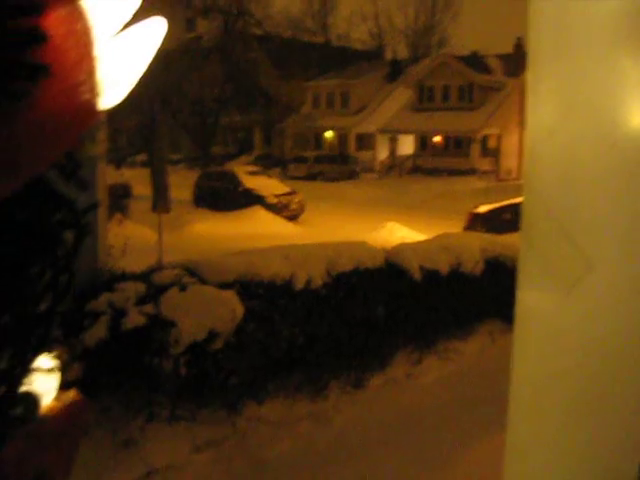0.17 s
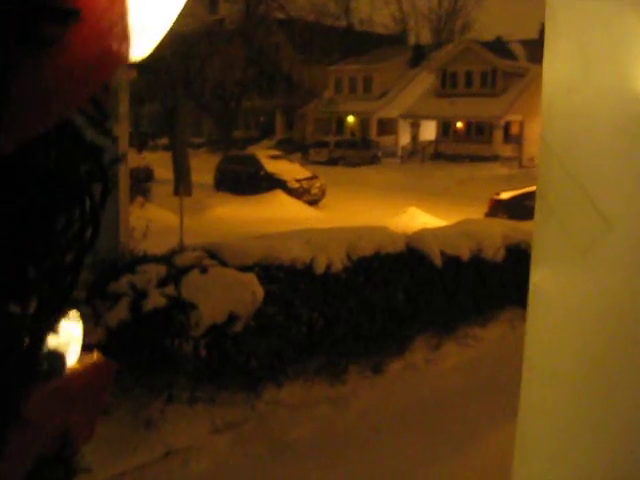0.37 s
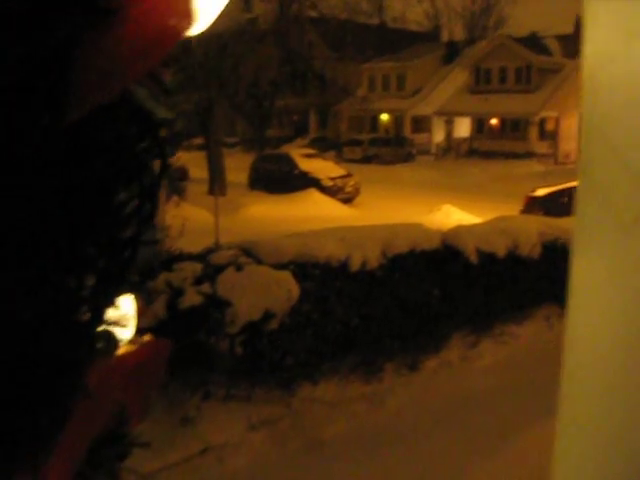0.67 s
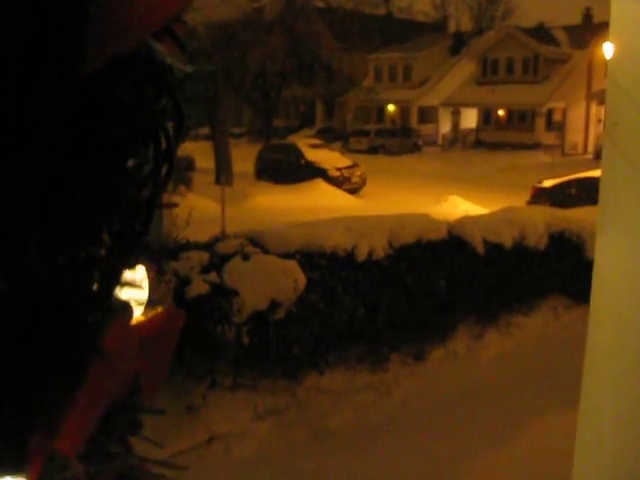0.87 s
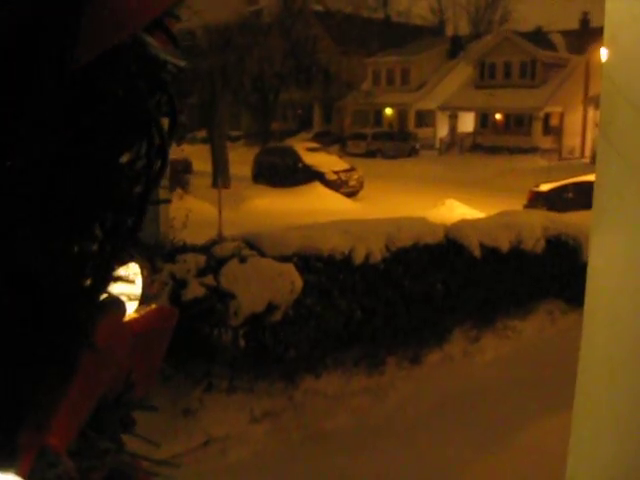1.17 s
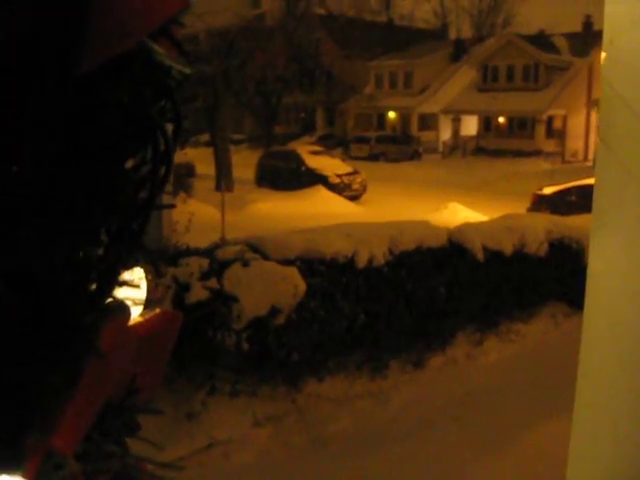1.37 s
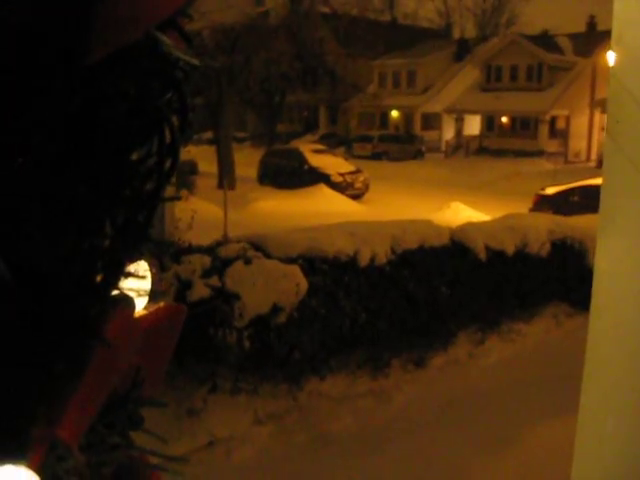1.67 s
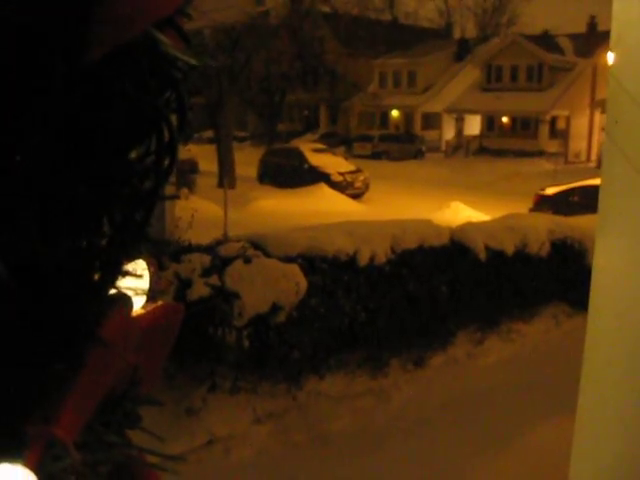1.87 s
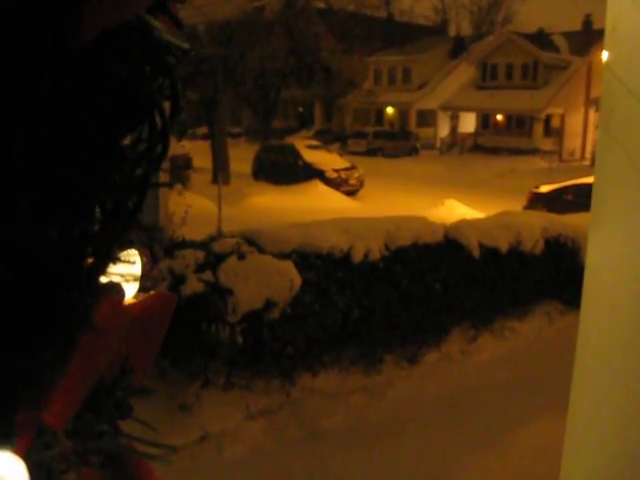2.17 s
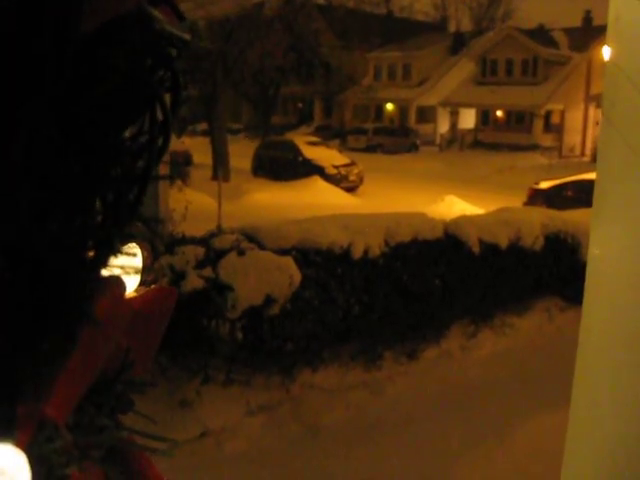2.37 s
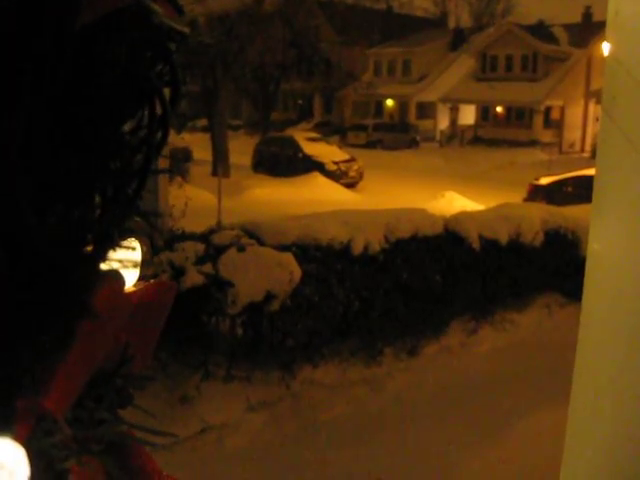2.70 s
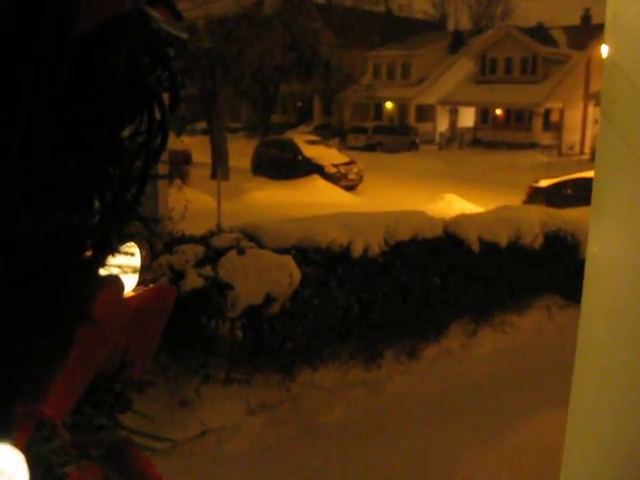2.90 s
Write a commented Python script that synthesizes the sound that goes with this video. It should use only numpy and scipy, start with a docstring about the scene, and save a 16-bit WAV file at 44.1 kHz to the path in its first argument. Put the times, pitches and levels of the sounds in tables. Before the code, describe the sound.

Ice pellets fall on crusted snow, hedge and porch at night: a fine steady hiss and crackling patter, with irregular crisp taps near a small camera in a doorway and a very faint street hum.

```python
"""Ice pellets tap and scatter on crusted snow, a hedge and a porch at night, heard by a small camera
in a doorway. Far pellets are flickering shaped noise (hiss); nearer ones are noise bursts (patter) and
short decaying sines (ticks); the nearest are timed taps of ring, crack, board knock and splinters.
Low shaped noise is the street hum. The camera's input has a broad notch in the treble, near 7.9 kHz."""
import sys
import numpy as np
from scipy import signal
from scipy.fft import rfft, irfft
from scipy.io import wavfile
from scipy.ndimage import uniform_filter1d

SR = 44100
rng = np.random.default_rng(int(sys.argv[2]) if len(sys.argv) > 2 else 0)


def wrap_up_sound(samples):
    """Save the sound to the file named by the first command line argument, as 16-bit audio."""
    columns = np.atleast_2d(samples).T
    # keep every value between -1 and 1, then stretch to whole-number steps
    tamed = np.clip(columns, -1, 1)
    steps = np.round(tamed * 32767).astype(np.int16)
    wavfile.write(sys.argv[1], SR, steps)


N = 134064  # samples


def undb(db):
    """dB to amplitude ratio."""
    return 10 ** (np.asarray(db) / 20)


def unit(x):
    """Scale to RMS 1."""
    return x / np.sqrt(np.mean(x ** 2))


def colour(x, points):
    """Shape the spectrum by (f/Hz, level/dB) points, log-frequency interpolation; RMS 1."""
    hz, db = np.array(points).T
    f = np.maximum(np.fft.rfftfreq(len(x), 1 / SR), 1)
    gain = undb(np.interp(np.log(f), np.log(hz), db))
    return unit(irfft(rfft(x) * gain, len(x)))


def band(x, lo_hz, hi_hz):
    """Band-pass noise, scaled to RMS 1 over its first 3 ms."""
    sos = signal.butter(3, [lo_hz, hi_hz], "band", fs=SR, output="sos")
    y = signal.sosfilt(sos, x)
    return y / np.sqrt(np.mean(y[:132] ** 2))


def walk(rate_hz):
    """Random levels held 1 / rate_hz, smoothed over one hold; RMS near 1."""
    hold = int(SR / rate_hz)
    steps = np.repeat(rng.standard_normal(N // hold + 1), hold)
    return unit(uniform_filter1d(steps, hold))[:N]


def add(out, start_s, x):
    """Mix x into out at start_s, cut at the end of out."""
    i = int(start_s * SR)
    out[i:i + len(x)] += x[:max(len(out) - i, 0)]


# Pellet noise spectrum, far hiss and patter: f/Hz, relative density level/dB
PELLET_SPECTRUM = [(300, -6.5), (700, -8.5), (1500, -4), (2500, -1.5), (4000, -0.5), (6000, -2), (9000, -2),
                   (12000, -0.5), (16000, -1)]
HISS_DB, FLICKER_RMS_DB = -3, 1.5


def hiss():
    """Countless far pellets merge into shaped noise; its level flickers a little."""
    gain = undb(HISS_DB + FLICKER_RMS_DB * walk(rate_hz=60))
    return gain * colour(rng.standard_normal(N), PELLET_SPECTRUM)


PATTER_PER_S, PATTER_DB, PATTER_SPREAD_DB, PATTER_FADE_S = 1500, -5, 2.5, 0.0019


def patter():
    """Small pellets crush into the crust: broadband bursts whose powers add and decay."""
    u = rng.random((int(PATTER_PER_S * N / SR), 2))
    hit_power = np.zeros(N)
    # factor 2: amplitude dB to power
    hit_power[(u[:, 0] * N).astype(int)] = undb(-2 * PATTER_SPREAD_DB * np.log(1 - u[:, 1]))
    power = signal.lfilter([1], [1, -np.exp(-2 / (PATTER_FADE_S * SR))], hit_power)
    bursts = np.sqrt(power) * rng.standard_normal(N)
    return undb(PATTER_DB) * colour(bursts, PELLET_SPECTRUM)


TICKS_PER_S, TICK_DB, TICK_SPREAD_DB = 500, -14.5, 2.5
TICK_FADE_S, TICK_LOW_HZ, TICK_OCTAVES = 0.0017, 2256, 2.6


def ticks():
    """Pellets on twigs and ice: decaying sines of random length, at random pitch."""
    out, t = np.zeros(N), np.arange(256) / SR
    for at, pitch, strength, length in rng.random((int(TICKS_PER_S * N / SR), 4)):
        hz = min(TICK_LOW_HZ * 2 ** (TICK_OCTAVES * pitch), .4 * SR)
        fade_s = TICK_FADE_S * (0.12 + 3.0 * length)
        level = undb(-TICK_SPREAD_DB * np.log(1 - strength))
        add(out, at * N / SR, level * np.exp(-t / fade_s) * np.sin(2 * np.pi * hz * t))
    return undb(TICK_DB) * unit(out)


# Street hum spectrum: f/Hz, relative density level/dB
STREET_SPECTRUM = [(20, -57), (50, -2), (100, -1.5), (170, 1), (215, 0.5), (241, 3.5), (270, -3.5),
                   (340, -6), (500, -3), (1000, -9.5), (2000, -17.5)]
STREET_DB = -50


def street():
    """Quiet street: steady noise weighted to the lows."""
    return undb(STREET_DB) * colour(rng.standard_normal(N), STREET_SPECTRUM)


# Porch board modes under a hard pellet: f/Hz, relative level/dB, t60/s
BOARD_MODES = [(491, -13.5, .06), (699, -5.5, 0.047), (798, -8, .11), (875, 7, 0.011), (1036, -1, 0.036),
               (1266, -13.5, 0.079), (1441, -10.5, 0.11), (1686, -5, 0.033), (1827, -11, 0.046),
               (2720, -11.5, 0.098)]


def board_modes(t):
    """Decaying sine per board mode; summed peak is 1."""
    modes = np.array([undb(db) * np.exp(-np.log(1000) * t / t60_s) * np.sin(2 * np.pi * hz * t)
                      for hz, db, t60_s in BOARD_MODES])
    return -modes / np.abs(modes.sum(axis=0)).max()


# Nearest pellets: t/s, relative knock level/dB, ring f/Hz, relative ring level/dB,
# high f/Hz, relative high level/dB
NEAREST_PELLETS = [(0.0461, -72, 3670, -44, 12000, -30.5), (0.051, -61, 3600, -48, 12340, -43),
                   (0.0934, -49.5, 6200, -40, 12640, -41), (0.1169, -53, 3240, -41, 14410, -38),
                   (0.182, -58, 4720, -46, 13070, -37), (0.1995, -48, 4200, -39, 14600, -33),
                   (0.215, -63, 4460, -48, 13720, -39), (0.228, -65, 3290, -61, 11630, -40),
                   (0.2371, -69, 6120, -43, 10400, -41), (0.265, -56, 5150, -36, 10310, -44),
                   (0.2968, -57, 2670, -47, 12920, -42), (0.3462, -56, 6140, -48, 10750, -39),
                   (0.3559, -60, 3570, -39.5, 13370, -40), (0.3695, -58, 5260, -33, 9900, -35),
                   (0.3796, -67, 5560, -42, 10700, -36), (0.3887, -53, 5160, -32, 12700, -34.5),
                   (0.3904, -57, 4640, -25.5, 10830, -42), (0.3967, -67, 4570, -43, 11760, -33),
                   (0.417, -63, 4280, -38, 13590, -37), (0.483, -68, 5040, -51, 9820, -43),
                   (0.5158, -37, 6000, -28, 13100, -31), (0.5287, -61, 4600, -40, 13800, -44),
                   (0.54, -68, 6310, -53.5, 13630, -41), (0.692, -32.5, 3950, -28, 14600, -30),
                   (0.7072, -41, 4570, -34, 14210, -32), (0.6952, -34, 2330, -32, 14300, -42),
                   (0.713, -59, 4390, -44, 13070, -39), (0.8095, -60, 5400, -39, 14790, -42),
                   (0.8156, -64, 2520, -41, 9840, -45), (0.8278, -39, 4900, -35.5, 15090, -48),
                   (0.8459, -45, 4900, -30, 15200, -36.5), (0.8978, -59, 5430, -41, 13330, -40),
                   (0.9189, -59, 4330, -36.5, 12580, -36), (0.981, -61, 4400, -45, 15090, -51),
                   (1.0161, -66, 4390, -46, 9990, -45), (1.0761, -64, 4640, -38, 12730, -47),
                   (1.168, -46, 5210, -40, 14280, -41), (1.1997, -54, 3040, -40, 12830, -47),
                   (1.2179, -57, 3740, -22, 11500, -26), (1.2205, -49, 4340, -43, 12400, -33),
                   (1.223, -63, 3120, -32, 14000, -40), (1.2294, -61, 4950, -40, 15050, -31),
                   (1.244, -46, 5790, -35, 14360, -32), (1.2678, -52, 6000, -37, 13050, -35),
                   (1.278, -69, 4440, -45, 14880, -35), (1.2878, -41, 3250, -36.5, 10190, -52),
                   (1.3198, -40, 3800, -34, 13400, -30.5), (1.3331, -55, 5560, -34, 12500, -34),
                   (1.375, -43.5, 2900, -39, 13000, -33), (1.4069, -58, 5130, -32, 14360, -31),
                   (1.413, -45, 6150, -33, 9600, -29.5), (1.4242, -57, 3900, -37, 10380, -36),
                   (1.441, -53, 3230, -59, 11610, -37), (1.4522, -61, 6270, -40, 12360, -40),
                   (1.4622, -54, 4690, -39, 14080, -35), (1.4948, -51, 5100, -39, 10120, -40),
                   (1.5157, -45, 6460, -39, 13240, -43), (1.53, -47, 4690, -37, 14560, -41),
                   (1.54, -57, 4240, -57, 9880, -41), (1.5695, -58, 5020, -44, 11070, -42),
                   (1.5938, -52, 4970, -36, 11600, -38), (1.6129, -50, 4390, -49, 10790, -42),
                   (1.623, -59, 4560, -37, 10400, -36), (1.6354, -46, 3850, -30.5, 14190, -35),
                   (1.659, -49, 4900, -37.5, 12770, -38), (1.668, -62, 2470, -41, 15250, -32),
                   (1.7295, -49, 6300, -33, 10100, -40), (1.736, -55, 5100, -40, 10000, -36),
                   (1.7423, -44, 3980, -36.5, 13310, -41), (1.7493, -60, 2650, -48, 11860, -41),
                   (1.756, -45, 4400, -44, 12300, -37.5), (1.8105, -45.5, 4750, -41, 13310, -39),
                   (1.829, -62, 5340, -45, 10700, -31), (1.8355, -42, 3970, -35, 9900, -33),
                   (1.8428, -68, 2820, -40.5, 11300, -46), (1.8693, -53, 4900, -32, 13700, -33),
                   (1.903, -47, 4900, -30, 11000, -33), (1.9049, -47, 3120, -31, 14300, -29.5),
                   (1.9131, -64, 4540, -43, 10400, -44), (1.918, -41, 4500, -31.5, 14130, -40),
                   (1.9675, -56, 3620, -53, 12300, -36.5), (2.0188, -51, 3020, -44, 14500, -37),
                   (2.058, -68, 6220, -47, 10200, -37), (2.0803, -65, 4670, -45, 10230, -41),
                   (2.103, -46, 5600, -35, 14210, -35), (2.1372, -50, 5120, -43, 13400, -37),
                   (2.147, -66, 5900, -35, 13260, -36), (2.1548, -62, 4460, -42, 9370, -37),
                   (2.221, -18.5, 3900, -28, 13370, -25), (2.2255, -36, 2620, -36, 15200, -36),
                   (2.2324, -49, 4840, -53, 9600, -34), (2.292, -45, 4180, -31, 12830, -32.5),
                   (2.2981, -41, 3240, -28, 11600, -31), (2.2983, -64, 5860, -26, 11700, -31),
                   (2.306, -50, 4730, -45, 11500, -39), (2.311, -59, 3340, -55, 10700, -35.5),
                   (2.3263, -63, 5960, -45, 14860, -37), (2.351, -45, 6400, -40, 10340, -45),
                   (2.3851, -56, 5200, -34.5, 10800, -39), (2.4222, -50, 4310, -39.5, 13400, -36),
                   (2.438, -66, 4070, -45, 12080, -35.5), (2.455, -63, 5790, -36, 9300, -49),
                   (2.4697, -62, 4270, -36.5, 9220, -40), (2.4978, -50, 6200, -33.5, 13400, -29.5),
                   (2.5215, -62, 5750, -39, 14320, -32), (2.533, -55, 4500, -34, 12800, -24.5),
                   (2.5753, -58, 3600, -44, 11200, -42), (2.5812, -66, 5000, -44, 11090, -40),
                   (2.611, -63, 5700, -38, 15220, -37), (2.6138, -63, 4600, -34.5, 12000, -44),
                   (2.6277, -54, 3820, -41, 10900, -35.5), (2.6798, -66, 4200, -36, 12490, -40),
                   (2.727, -63, 5730, -38, 13370, -39), (2.7562, -62, 6550, -33, 12360, -43),
                   (2.7653, -64, 1840, -35, 12270, -37), (2.7707, -60, 2780, -51, 11670, -35),
                   (2.784, -60, 2560, -49, 14250, -37), (2.7918, -60, 5460, -35, 15090, -41),
                   (2.8, -57, 4300, -34, 13110, -40), (2.8177, -62, 3520, -39, 10700, -38),
                   (2.8582, -50, 5990, -35, 13740, -34), (2.8683, -62, 4160, -37, 10700, -36),
                   (2.8878, -44, 3960, -33, 13720, -38), (2.9238, -58, 3950, -38, 13500, -33),
                   (2.9532, -53, 6140, -31, 13500, -32), (3.0106, -59, 3470, -42, 15100, -31)]
RISE_S, CRACK_FADE_S, RING_FADE_S = 0.00021, 0.00098, 0.00082
SCATTER_FADE_S, HIGH_SCATTER_FADE_S = 0.012, 0.0056
RING_DB, CRACK_DB, SCATTER_DB = 9.5, -2, -7
HIGH_DB, HIGH_SCATTER_DB, SPLINTER_RMS_DB = 5.5, -10.5, 2
CRACK_BELOW, CRACK_ABOVE = 0.67, 1.53  # crack band edges / ring f
SNAP_DB, SNAP_FADE_S, SNAP_RISE_S = 5, .00016, .00005
HARD_DB, HARD_GAIN = -33, .9  # above this high level, snap gains on the crack, dB per dB
KNOCK_DB, KNOCK_RISE_S, KNOCK_LEAD_S = 9.5, .0004, 0.00034
RATTLE_FADE_S, BOARD_SCATTER_DB = 0.011, 2


def taps():
    """Nearest pellets: short ring, crack, hard-contact snap, board knock, scattering splinters."""
    out, t = np.zeros(N), np.arange(3072) / SR
    rise = np.sin(np.pi / 2 * np.minimum(t / RISE_S, 1)) ** 2
    modes = board_modes(t)
    low_cut = signal.butter(4, 370, "high", fs=SR, output="sos")
    snap_env = np.minimum(t / SNAP_RISE_S, 1) * np.exp(-t / SNAP_FADE_S)
    knock_rise = np.minimum(t / KNOCK_RISE_S, 1)
    for start_s, knock_db, ring_hz, mid_db, high_hz, high_db in NEAREST_PELLETS:
        mid_noise, high_noise, rattle_noise, splinter_noise = rng.standard_normal((4, len(t)))
        # board mode levels vary at random from tap to tap
        boards = undb(BOARD_SCATTER_DB * rng.standard_normal(len(BOARD_MODES))) @ modes
        splinter_db = SPLINTER_RMS_DB * unit(uniform_filter1d(splinter_noise, size=60))
        splinters = unit(undb(splinter_db))

        def crack_env(scatter_db, fade_s):
            """Fast crack decay plus slower uneven splinters."""
            scatter = undb(scatter_db) * splinters * np.exp(-t / fade_s)
            return rise * (np.exp(-t / CRACK_FADE_S) + scatter)

        ring = undb(RING_DB) * rise * np.exp(-t / RING_FADE_S) * np.sin(2 * np.pi * ring_hz * t)
        crack = band(mid_noise, CRACK_BELOW * ring_hz, CRACK_ABOVE * ring_hz)
        mid = ring + undb(CRACK_DB) * crack_env(SCATTER_DB, SCATTER_FADE_S) * crack
        mid = signal.sosfilt(signal.butter(2, .6 * ring_hz, "high", fs=SR, output="sos"), mid)

        glint = band(high_noise, 7500, 16500) + .5 * band(high_noise, .9 * high_hz, 1.1 * high_hz)
        hard_db = HARD_GAIN * max(high_db - HARD_DB, 0)
        high_crack = crack_env(HIGH_SCATTER_DB, HIGH_SCATTER_FADE_S) * glint
        snap = snap_env * np.sin(2 * np.pi * high_hz * t)
        high = undb(HIGH_DB - hard_db / 2) * high_crack + undb(SNAP_DB + hard_db) * snap

        rattle = .09 * np.exp(-t / RATTLE_FADE_S) * band(rattle_noise, 600, 3000)
        knock = undb(KNOCK_DB) * knock_rise * (boards + rattle)
        add(out, start_s, undb(mid_db) * mid + undb(high_db) * high)
        add(out, start_s - KNOCK_LEAD_S, undb(knock_db) * signal.sosfilt(low_cut, knock))
    return out


# Shower strength, gain of the far hiss: t/s, level/dB
SHOWER_STRENGTH = [(.05, -38), (.3, -40), (.45, -38.5), (.6, -40), (.9, -40), (1.18, -39.5), (1.25, -38.5),
                   (1.5, -38.5), (1.75, -39.5), (2.0, -39.5), (2.2, -39), (2.45, -40), (2.7, -39),
                   (2.77, -37), (2.9, -36), (3.03, -37)]
CALM_DB, NEAR_GROWTH = -41.5, 1.7  # near and far gains meet here; near dB per far dB


def scene():
    """Shower gain drives hiss, patter and ticks; taps and street add at their own levels."""
    shower_db = np.interp(np.arange(N) / SR, *np.array(SHOWER_STRENGTH).T)
    far = undb(shower_db) * hiss()
    near = undb(CALM_DB + NEAR_GROWTH * (shower_db - CALM_DB)) * (patter() + ticks())
    return (far + near + street() + taps())[None]


NOTCH_HZ, NOTCH_WIDTH_HZ, TOP_HZ = 7890, 2080, 15780
START_S, OPEN_S = 0.035, 0.0021


def record(dry):
    """Camera input: opens after a moment, notches the treble, cuts the top."""
    b, a = signal.iirnotch(NOTCH_HZ, NOTCH_HZ / NOTCH_WIDTH_HZ, fs=SR)
    opening = np.clip((np.arange(N) / SR - START_S) / OPEN_S, 0, 1)
    notched = signal.lfilter(b, a, dry * opening)
    top_cut = signal.ellip(12, .3, 70, TOP_HZ, fs=SR, output="sos")
    return signal.sosfilt(top_cut, notched)


dry = scene()
out = record(dry)
wrap_up_sound(out)
```